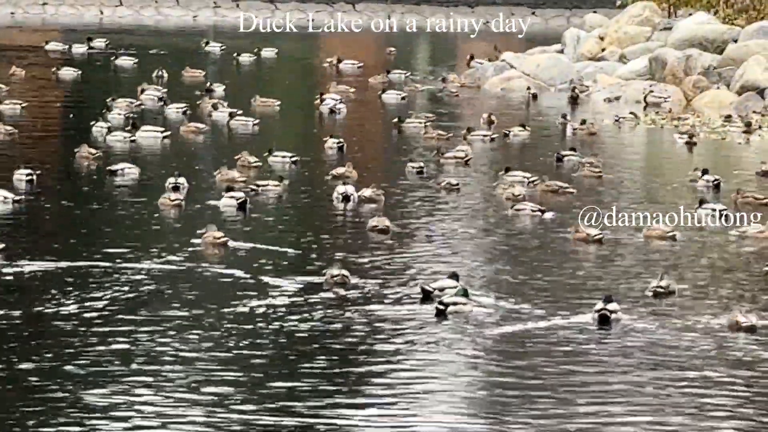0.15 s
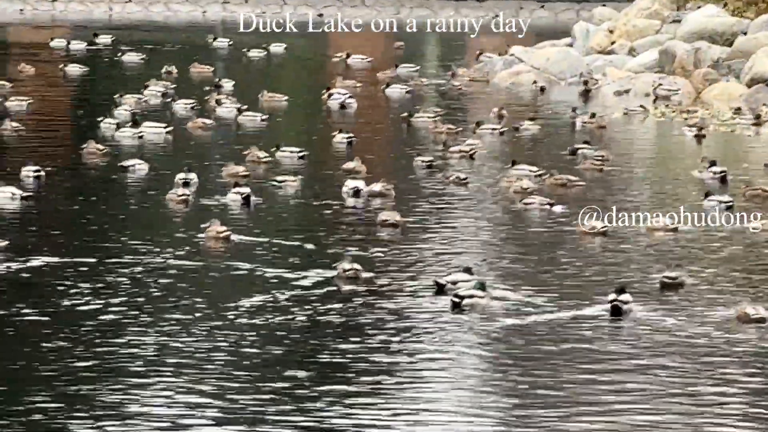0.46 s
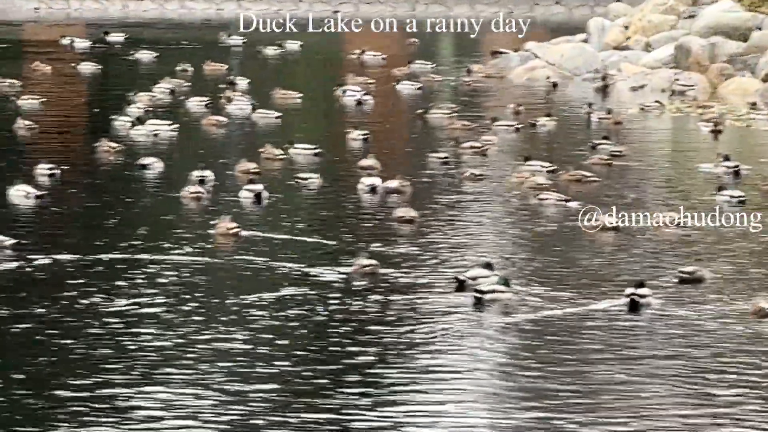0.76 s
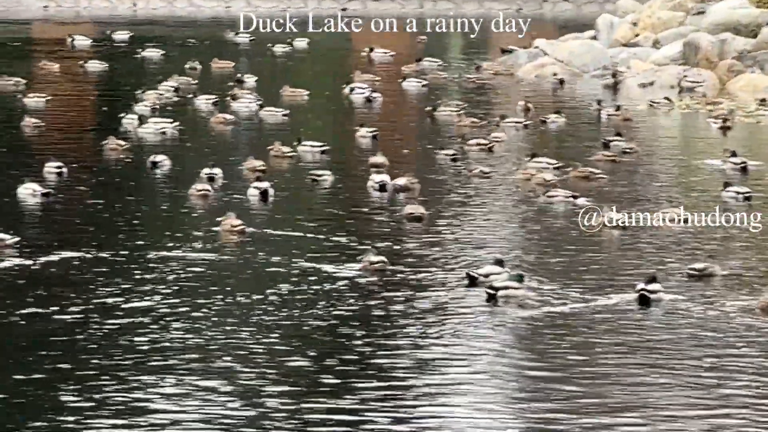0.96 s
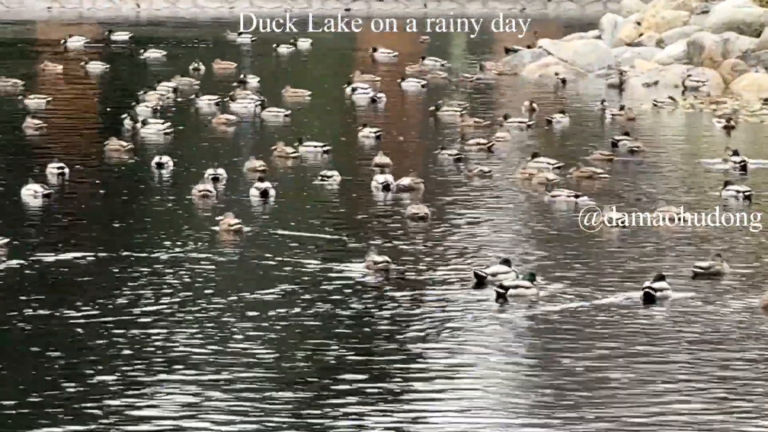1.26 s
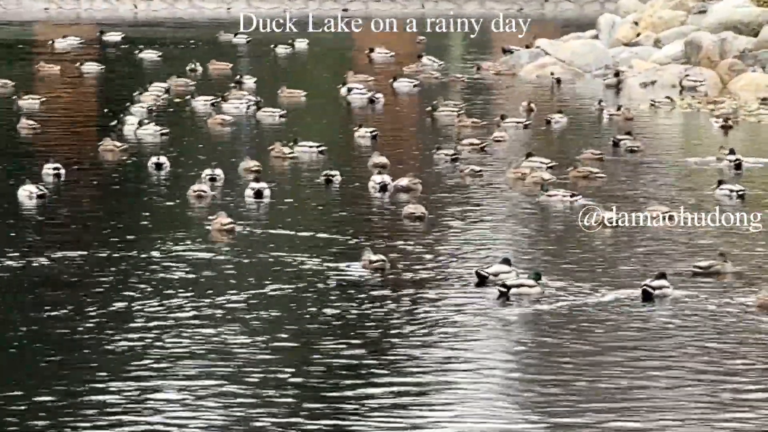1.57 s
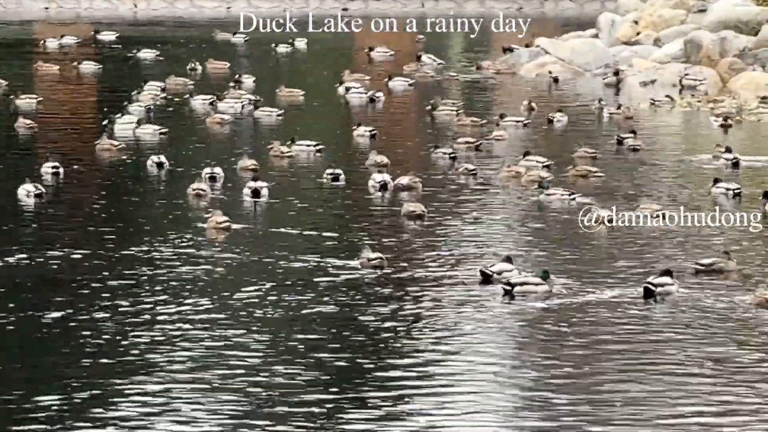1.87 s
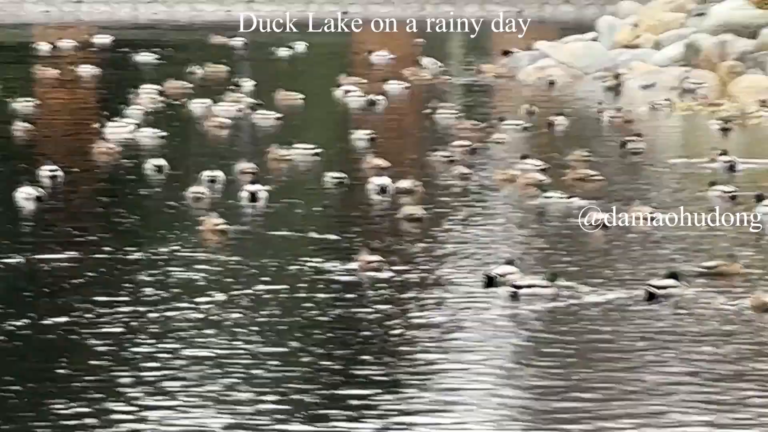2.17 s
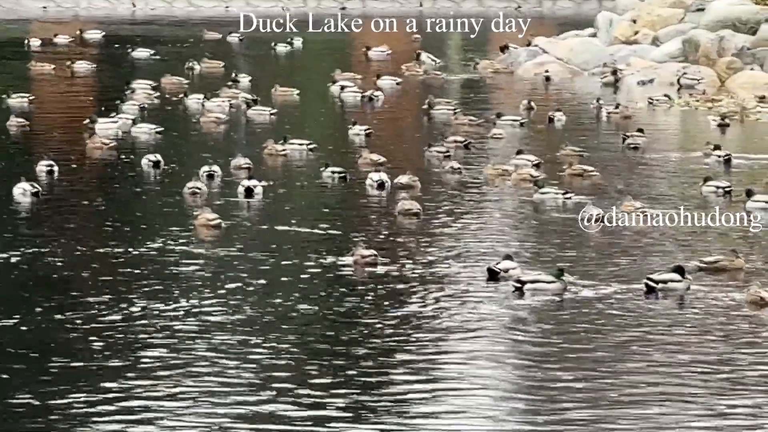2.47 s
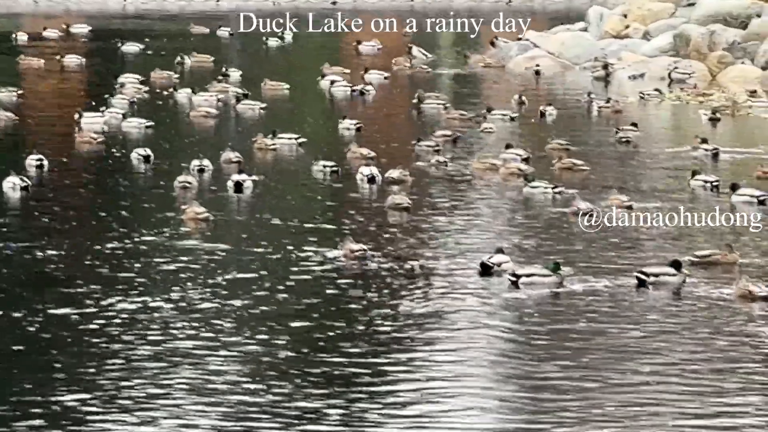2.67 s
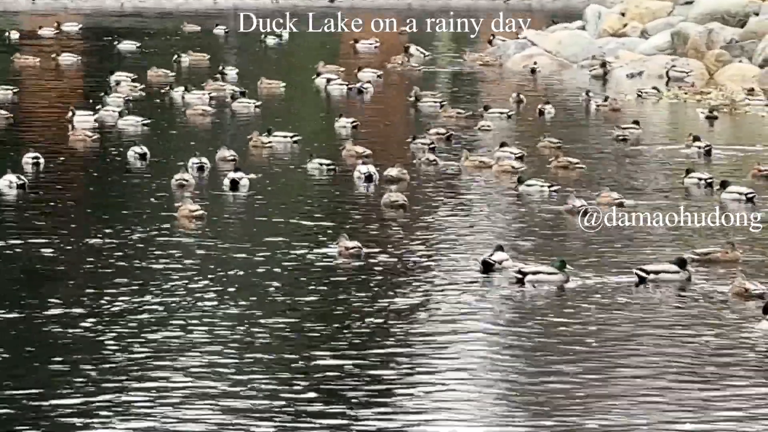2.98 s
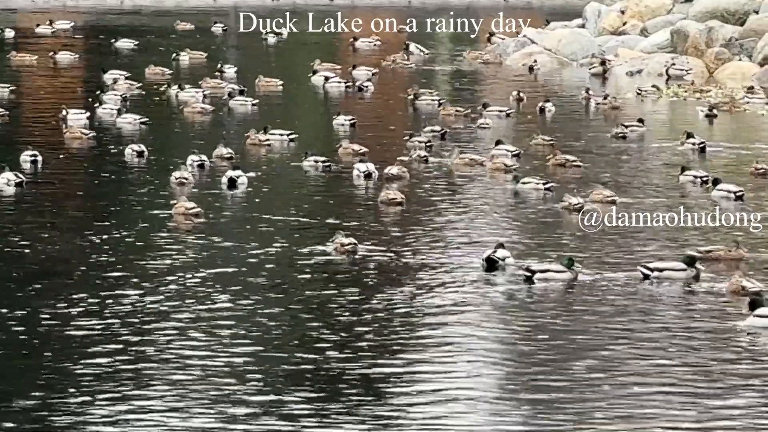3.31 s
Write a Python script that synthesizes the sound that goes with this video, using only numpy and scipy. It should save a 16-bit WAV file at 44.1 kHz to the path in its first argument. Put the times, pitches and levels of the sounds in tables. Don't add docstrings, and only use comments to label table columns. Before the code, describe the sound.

A single duck gives ten quick nasal quacks, starting high and loud, sinking lower, shorter and raspier, with a soft outdoor echo over a lake; low wind rumbles in the microphone, with faint raindrop ticks.

```python
import sys
import numpy as np
from scipy import signal
from scipy.io import wavfile
from scipy.ndimage import uniform_filter1d

SR = 44100
rng = np.random.default_rng(int(sys.argv[2]) if len(sys.argv) > 2 else 0)


def to_linear_factor(level_db):
    exponent = np.asarray(level_db, float) / 20
    return 10 ** exponent


def generate_wav(sig):
    pcm = np.round(np.clip(np.atleast_2d(sig).T, -1, 1) * 32767).astype(np.int16)
    wavfile.write(sys.argv[1], SR, pcm)


N = 152145


# time_s, pitch_hz, effort_db, bill_opening_db
EARLY_QUACKS = [
    [(.233, 289, -44, -7), (.241, 319.5, -21.5, -11), (.251, 350.6, -20, 1), (.287, 452.8, -13, -2.5),
     (.319, 486.3, -15, -1), (.377, 502, -18.5, 0), (.425, 465, -17, 1), (.445, 370, -31, 0),
     (.455, 331, -49, -1)],
    [(.546, 316.2, -31, -4), (.56, 344.2, -28, 5.5), (.584, 443.3, -24.5, 7.5), (.596, 466, -16.5, -3),
     (.63, 480.9, -19.5, 4.5), (.694, 462.7, -17, 0), (.75, 424, -21.5, 5), (.77, 406, -27.5, -1.5),
     (.785, 358, -42, -1)],
    [(.876, 269, -40, -2), (.886, 282.8, -26.5, -2.5), (.91, 391, -24.5, 6), (.93, 441.4, -22.5, 5.5),
     (.956, 450.3, -19, 1.5), (1.004, 440.8, -19.5, 3.5), (1.082, 394.7, -21.5, 1.5), (1.104, 332, -27, -6),
     (1.125, 306, -50, -7)],
    [(1.206, 241.7, -45, -0.5), (1.216, 258.3, -31, 0), (1.238, 348.5, -21, 1), (1.256, 403.6, -26.5, 8),
     (1.274, 423, -20, 3), (1.326, 415.7, -20, 1.5), (1.36, 391, -23.5, 3), (1.42, 367, -25, -2.5),
     (1.455, 298, -36.5, -12.5)],
    [(1.536, 273.3, -44.5, -4), (1.55, 292, -27.5, -3.5), (1.572, 364.5, -18, -0.5),
     (1.594, 389, -25.5, 5.5), (1.632, 400.5, -21, 2), (1.686, 362, -25, -2.5), (1.724, 354.6, -29, 1.5),
     (1.748, 304.7, -22, -6), (1.775, 282, -54.5, -5.5)],
]
# time_s, pitch_hz, effort_db, bill_opening_db
LATE_QUACKS = [
    [(1.858, 294.8, -41.5, -18), (1.872, 305.7, -19.5, -7), (1.896, 358.3, -18, -5),
     (1.92, 381.3, -19.5, 0.5), (1.958, 376.6, -20.5, -0.5), (1.97, 371.5, -20, -2),
     (2.038, 338.6, -27, -7), (2.054, 298, -23.5, -2), (2.08, 278, -48, -11.5)],
    [(2.168, 318.5, -36, -9.5), (2.178, 311.3, -23.5, -18), (2.19, 325, -23, -2), (2.2, 349.6, -15, -17),
     (2.218, 370.7, -18, -3.5), (2.274, 357.8, -18, -6.5), (2.3, 339.6, -22.5, -1.5),
     (2.352, 307.3, -25, -13.5), (2.372, 283, -49.5, -12)],
    [(2.473, 295.4, -33.5, -14.5), (2.485, 306.2, -19, -16), (2.505, 341.2, -20, -1),
     (2.523, 352.4, -16, -6.5), (2.571, 347.5, -19, -2), (2.611, 331.5, -24.5, -6.5),
     (2.623, 324, -31.5, -19), (2.641, 282, -22, -5), (2.66, 273, -41, -6)],
    [(2.778, 225, -33, -16), (2.788, 252, -23, -17.5), (2.806, 314.8, -16, -4.5), (2.814, 329, -18.5, -4.5),
     (2.85, 336.5, -20, 1), (2.886, 324.3, -17.5, -12), (2.912, 308.8, -23, -5), (2.932, 285.4, -25, -28),
     (2.95, 270, -29.5, -12)],
    [(3.075, 290.6, -40, -9), (3.087, 285, -24.5, -19), (3.097, 301, -17.5, -6.5),
     (3.111, 322.2, -21.5, -2.5), (3.131, 333.4, -15, -10.5), (3.167, 318.5, -24, 2.5),
     (3.183, 318.3, -20, -15), (3.198, 280.3, -22, -13), (3.232, 238, -45, -7)],
]
QUACK_VOICE = [(0.28, 0.17, 1.128), (0.39, 0.04, 0.997), (0.18, 0.09, 0.983), (0.14, 0.16, 0.979),
               (0.49, 0.56, 0.997), (0.59, 2.4, 0.99), (1, 2.7, 1.006), (0.97, 2.15, 0.984), (1, 0.32, 1),
               (0.98, 0.77, 0.983)]
# bill_scale, brightness_db, far_bill_lift_db, sag_per_s
QUACK_BILL = [(0.98, -8, 0.5, 0.54), (0.908, -5, -2.5, .2), (0.97, -7, -1.5, 0.53), (0.94, -9.5, -3, 0.44),
              (0.92, -10.5, -2, 0.53), (0.89, -10.5, -0.5, 0.44), (0.88, -12, 2.5, 0.33),
              (0.896, -14, 1, .3), (0.918, -16.5, -2, 0.335), (0.94, -18, -2.5, .3)]


def duck():
    out = np.zeros(N)
    for contour, voice, bill in zip(EARLY_QUACKS + LATE_QUACKS, QUACK_VOICE, QUACK_BILL):
        add(out, *quack(contour, *voice, *bill))
    return out


def quack(contour, sub, low_sub, scale, bill_scale, bright_db, lift_db, sag):
    time_s, pitch_hz, effort_db, open_db = np.transpose(contour)
    t = np.arange(time_s[0], time_s[-1], 1 / SR)
    hz = uniform_filter1d(np.interp(t, time_s, pitch_hz), size=500)
    open_db = np.interp(t, time_s, open_db)
    slack = np.clip(1 - hz / hz.max(), 0, 1)
    rough = np.clip(0.14 + 1.2 * slack, 0, 1)

    low, drive, puffs, shiver = syrinx(hz, slack, rough, sub, low_sub)
    mouth = scale * (1 - 0.26 * slack)
    voice = steady(throat(low, scale * (1 - 0.1 * slack), open_db))
    voice = voice + to_linear_factor(open_db) * steady(upper_throat(0.92 * drive + 0.08 * puffs, mouth))

    rasp = 0.67 * drive + 0.33 * puffs
    sagging_bill = bill_scale * (1 - sag * (t - t.mean()))
    treble = bill(rasp, bill_scale * np.sqrt(mouth), sagging_bill, bright_db, lift_db)
    voice = voice + to_linear_factor(bright_db + 0.55 * open_db - 25.5 * slack) * steady(treble)
    voice = carve_hollows(voice)
    creak = 1.1 * slack * evened(smooth(shiver, size=120))
    voice = voice * np.clip(1 + creak, 0.1, 2)

    edge_s = 0.006
    edge = np.clip(np.minimum(t - time_s[0], time_s[-1] - t) / edge_s, 0, 1)
    level = to_linear_factor(np.interp(t, time_s, effort_db))
    chest_level = np.sqrt(level * level.max())
    return time_s[0], edge * (level * voice + chest_level * chest(hz, rough, sub))


def syrinx(hz, slack, rough, sub, low_sub):
    wobble, shiver, hiss = rng.standard_normal((3, SR // 2))[:, :len(hz)]
    wobble = evened(uniform_filter1d(wobble, size=150))
    shiver = evened(uniform_filter1d(shiver, size=120))
    jitter, shimmer = 0.004, 0.12
    turns = np.cumsum(hz * (1 + jitter * (1 + 20 * slack) * wobble)) / SR
    k = np.arange(1, 90)[:, None]
    waves = np.cos(np.pi * k * turns) * (k * hz.max() < 31000) * (1 + shimmer * shiver)
    half, whole = waves[::2].sum(0), waves[1::2].sum(0)
    puffs = evened((1.7 + np.exp(-(turns / 2 % 1) / 3.4)) * hiss)

    def mixed(share):
        return (1 - rough) * evened(whole + (share + slack) * half) + rough * puffs

    return mixed(low_sub), mixed(sub), puffs, shiver


# centre_hz, width_hz, level_db
THROAT = [(1648, 175, 3.5)]
# centre_hz, width_hz, level_db
THROAT_FLANKS = [(1269, 353, -3), (1893, 234, -3.5)]


def throat(drive, scale, open_db):
    flanks = ring(drive, THROAT_FLANKS[:1], scale) + ring(drive, THROAT_FLANKS[1:], scale)
    sound = ring(drive, THROAT, scale) - to_linear_factor(0.53 * open_db) * flanks
    return signal.sosfilt(signal.butter(4, 1100, "high", fs=SR, output="sos"), sound)


# centre_hz, width_hz, level_db
UPPER_THROAT = [(2337, 353, -0.83), (2793, 338, -1.6)]


def upper_throat(drive, scale):
    return ring(drive, UPPER_THROAT, scale)


# centre_hz, width_hz, level_db
NEAR_BILL = [(3664, 394, -6.5), (4298, 790, -12)]
# centre_hz, width_hz, level_db
FAR_BILL = [(5100, 490, -13), (6020, 650, -11.5)]
# centre_hz, width_hz, level_db
BILL_AIR = [(7410, 1100, -34), (9000, 600, -38.5), (9930, 500, -38.5), (11400, 500, -56), (12800, 500, -58),
            (13900, 600, -62)]


def bill(rasp, near_scale, far_scale, bright_db, lift_db):
    out = ring(rasp, NEAR_BILL, near_scale)
    out += to_linear_factor(lift_db) * ring(rasp, FAR_BILL, far_scale)
    return out + to_linear_factor(13.5 + 0.74 * bright_db) * ring(rasp, BILL_AIR, 0.94)


# centre_hz, sharpness_q
HOLLOWS = [(2170, 28), (3320, 24.6), (3260, 33), (4665, 15.2), (7040, 15), (6960, 29), (8600, 27),
           (9390, 10), (11170, 14)]


def carve_hollows(voice):
    for hollow_hz, sharpness_q in HOLLOWS:
        voice = signal.lfilter(*signal.iirnotch(hollow_hz, sharpness_q, SR), voice)
    return voice


def chest(hz, rough, sub):
    chest_db, octave_db = -21, 13
    phase = 2 * np.pi * np.cumsum(hz) / SR
    octave = to_linear_factor(octave_db) * (1.1 - sub) * (1 - rough) ** 4 * np.sin(2 * phase)
    return to_linear_factor(chest_db) * (np.sin(phase) + octave)


def ring(drive, table, scale):
    blotch_db = 1.6
    waver = evened(smooth(rng.standard_normal((len(table), SR // 2)), size=600))[:, :len(drive)]
    out = np.zeros(len(drive))
    for i, (hz, width_hz, db) in enumerate(table):
        out += (-1) ** i * to_linear_factor(db + blotch_db * waver[i]) * resonate(drive, hz * scale, width_hz)
    return out


def resonate(x, hz, width_hz):
    turn = np.exp(2j * np.pi * np.cumsum(hz * np.ones(len(x))) / SR)
    r = np.exp(-np.pi * width_hz / SR)
    return 2 * (turn * signal.lfilter([(1 - r) ** 2], [1, -2 * r, r * r], x / turn)).real


# band_hz, t60_s
BANK_DECAY = [(500, 0.61), (1500, 0.48), (2100, 0.73), (2600, 0.34), (4000, 0.32), (8000, 0.15)]
# band_hz, level_db
BANK_COLOUR = [(800, 4), (1300, -2.5), (1640, -3), (2080, 5.5), (2500, -1.5), (3300, 3.5), (5000, -1)]


def bank(x):
    bank_db, delay_s, rise_s = -13.5, 0.0052, 0.0077
    taps = rng.standard_normal(SR) * np.clip((np.arange(SR) / SR - delay_s) / rise_s, 0, 1)
    hz, t, z = signal.stft(taps, SR, nperseg=256)
    z = z * to_linear_factor(read(BANK_COLOUR, hz)[:, None] - 60 * t / read(BANK_DECAY, hz)[:, None])
    tail = signal.istft(z, SR, nperseg=256)[1]
    return to_linear_factor(bank_db) * signal.fftconvolve(x, tail / np.linalg.norm(tail))[:N]


# start_s, peak_db, pitch_hz
RAIN_DROPS = [(.105, -48.5, 7000), (.132, -46.5, 6000), (0.167, -50, 6100), (1.386, -55, 11640),
              (1.957, -38.5, 12500), (2.503, -51.5, 12780), (2.584, -56.5, 10150), (2.98, -48.5, 4300),
              (3.393, -51, 6840), (3.437, -43, 5000)]


def drops():
    decay_s, relative_width = 0.0015, 0.45
    out, t = np.zeros(N), np.arange(600) / SR
    for start_s, peak_db, pitch_hz in RAIN_DROPS:
        burst = rng.standard_normal(600) * np.exp(-t / decay_s)
        tick = resonate(burst, pitch_hz, relative_width * pitch_hz)
        add(out, start_s, to_linear_factor(peak_db) * tick / abs(tick).max())
    return out


# band_hz, level_db_per_hz
WIND_COLOUR = [(12, -65), (20, -62), (48, -0.5), (70, 7), (107, -11), (129, -5.5), (285, -20), (400, -32.5),
               (520, -82), (880, -120)]
# time_s, level_db
WIND_GUSTS = [(0.0, -19.5), (0.17, -42.5), (0.24, -18), (0.33, -45), (0.35, -28.5), (0.53, -34.5),
              (0.98, -36.5), (1.02, -30), (1.2, -35.5), (1.27, -28.5), (1.5, -35.5), (2.799, -36),
              (2.95, -40.5), (3.16, -29.5), (3.419, -42), (3.45, -32)]


def wind():
    gust_db = 0.6 * np.interp(np.arange(N) / SR, *np.transpose(WIND_GUSTS)) - 14.5
    return to_linear_factor(gust_db) * airy(WIND_COLOUR, level_db=1.5, patchy_db=1.66, swell_db=0.27)


# band_hz, level_db_per_hz
WASH_COLOUR = [(250, -4), (400, -7.5), (650, -4.5), (1500, -12.5), (4000, -25.5), (8000, -41), (10500, -50),
               (13000, -44.5), (15600, -46)]


def wash():
    return airy(WASH_COLOUR, level_db=-46.5, patchy_db=1.2, swell_db=0.5)


# band_hz, side_share_db
SIDE_SHARE = [(25, -10), (60, -19), (130, -13), (300, -7.5), (700, -5), (1200, -4.5), (3000, -28.5),
              (12000, 4.5)]


def airy(colour, level_db, patchy_db, swell_db):
    frames, hz = N // 512 + 5, np.fft.rfftfreq(2048, 1 / SR)
    a, b, c, d, patches = rng.standard_normal((frames, 1025, 5)).T
    patches = uniform_filter1d(patches, size=10, axis=0)
    patches = evened(uniform_filter1d(patches, size=8, axis=1))
    swell = evened(uniform_filter1d(rng.standard_normal(frames), size=12))
    middle = a + 1j * b
    side = (c + 1j * d) * to_linear_factor(read(SIDE_SHARE, hz))[:, None]
    inside = (hz >= colour[0][0]) & (hz <= colour[-1][0])
    z = np.array([middle + side, middle - side]) * inside[:, None]
    z = z * to_linear_factor(read(colour, hz)[:, None] + patchy_db * patches + swell_db * swell)
    return to_linear_factor(level_db) * evened(signal.istft(z, nperseg=2048, noverlap=1536)[1][:, :N])


def evened(x):
    return x / np.sqrt(np.mean(x ** 2) + 1e-20)


def steady(x):
    return x / np.sqrt(abs(smooth(x ** 2, size=700)) + 1e-12)


def smooth(x, size):
    for _ in range(3):
        x = uniform_filter1d(x, size=size, axis=-1)
    return x


def read(points, hz):
    f, value = np.transpose(points)
    return np.interp(np.log(hz + 1), np.log(f + 1), value)


def add(mix, start_s, sound):
    part = mix[round(start_s * SR):][:len(sound)]
    part += sound[:len(part)]


def scene():
    quacks = duck()
    return quacks + bank(quacks) + drops() + wind() + wash()


def top_cut(x):
    return signal.sosfilt(signal.butter(12, 15500, fs=SR, output="sos"), x)


def record(dry):
    return top_cut(dry)


dry = scene()
out = record(dry)
generate_wav(out)
```